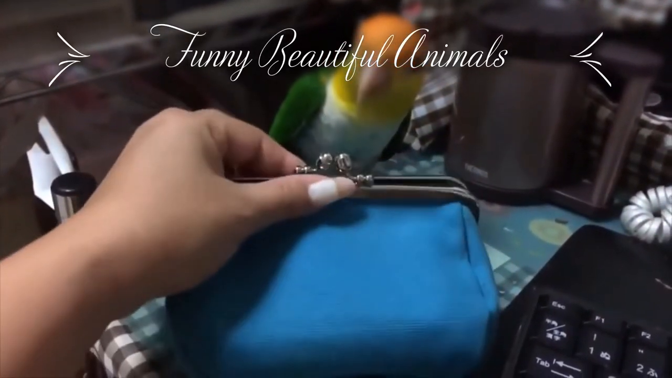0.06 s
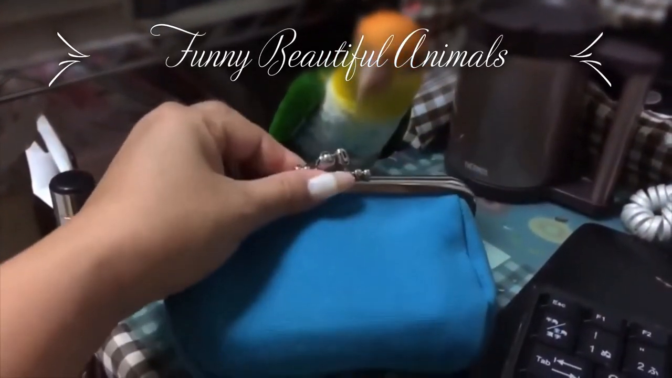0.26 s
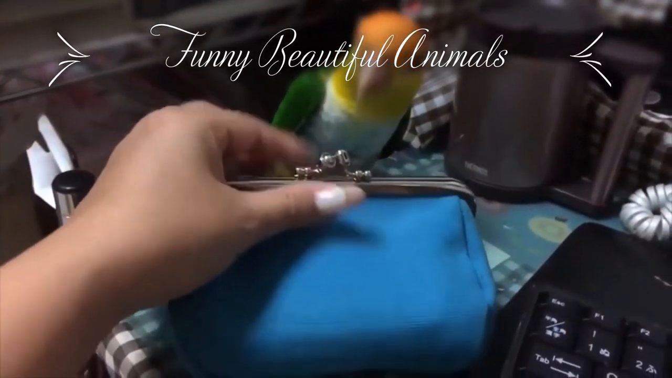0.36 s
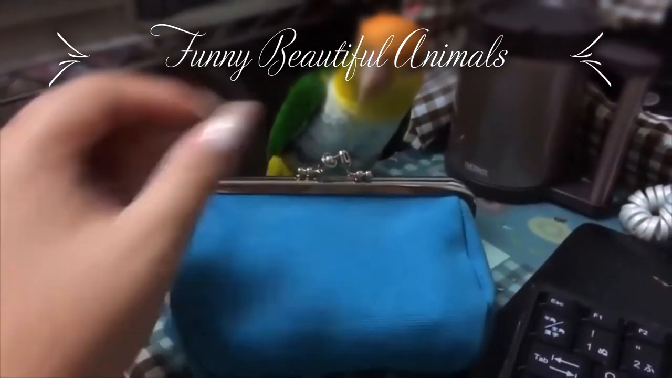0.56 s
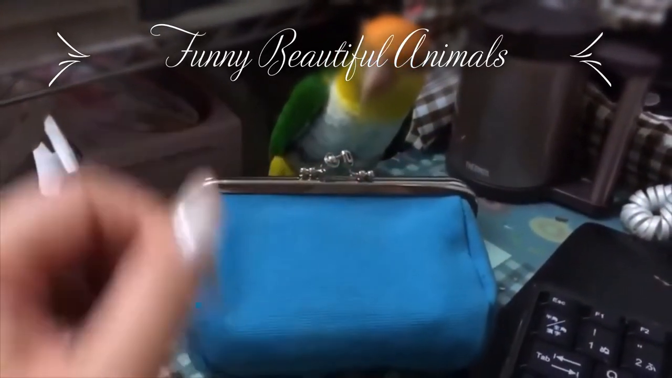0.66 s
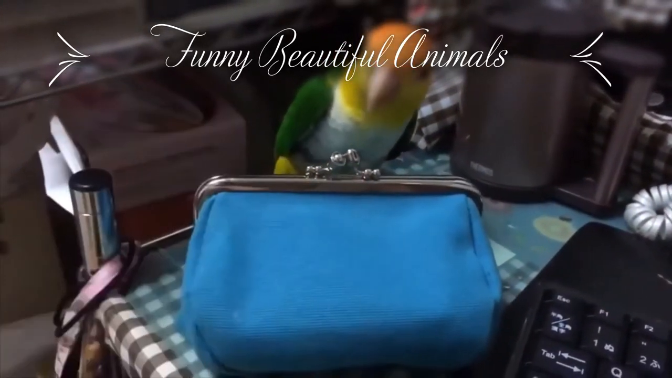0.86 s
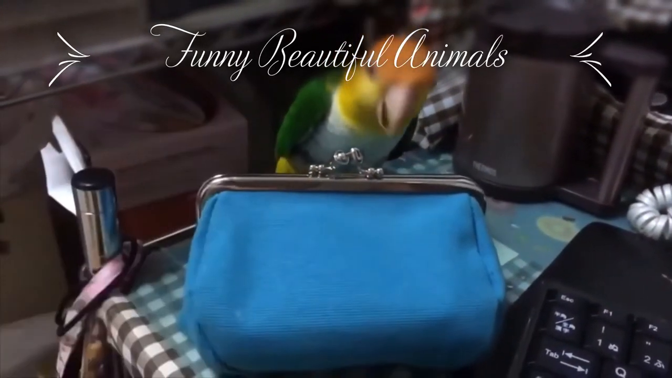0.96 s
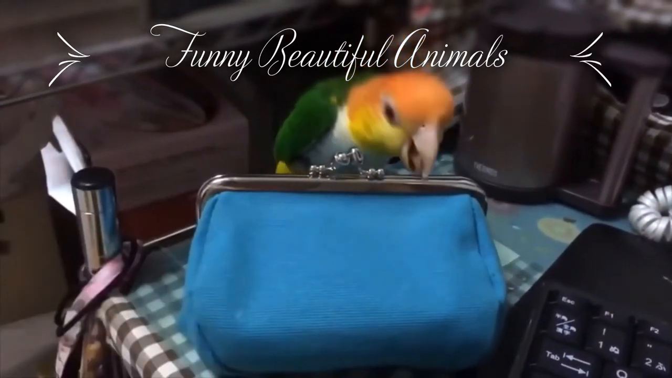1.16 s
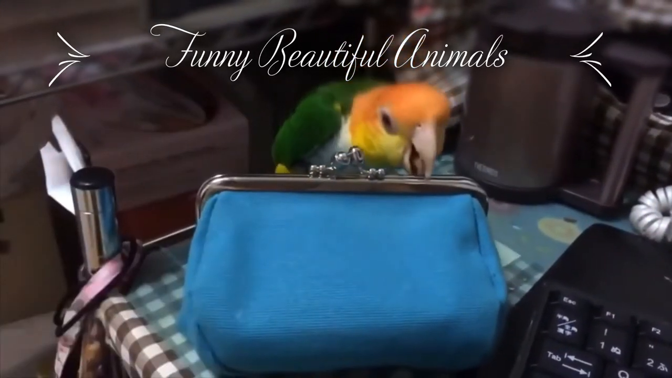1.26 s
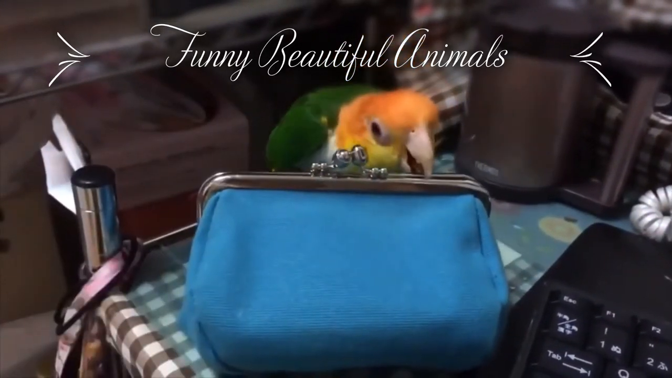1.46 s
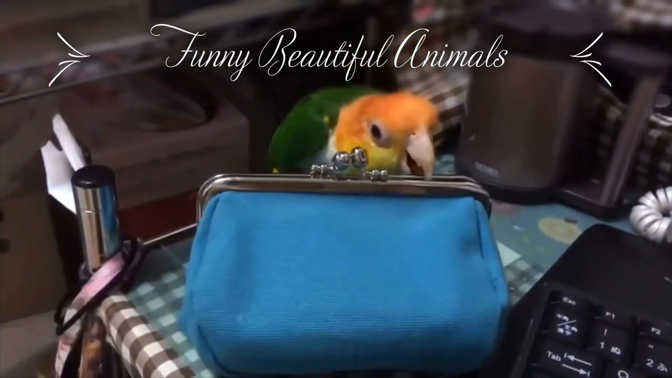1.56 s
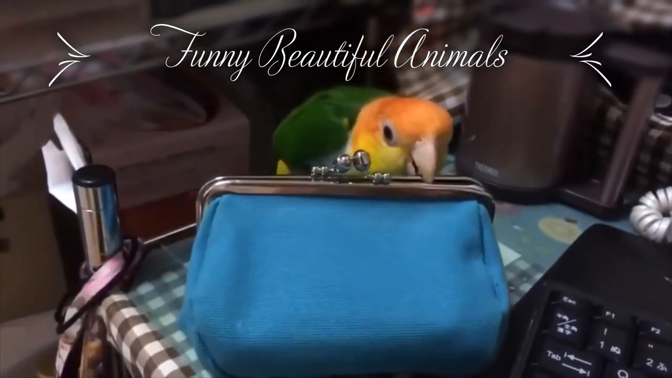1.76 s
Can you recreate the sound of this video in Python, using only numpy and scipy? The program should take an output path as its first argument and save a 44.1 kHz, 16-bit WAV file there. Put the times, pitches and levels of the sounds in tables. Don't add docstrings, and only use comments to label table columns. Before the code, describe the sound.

Metal purse clasp snapping shut with a sharp ringing crack, then faint beak and claw ticks over hum

```python
import sys
import numpy as np
from scipy import signal
from scipy.fft import rfft, irfft
from scipy.io import wavfile

SR = 44100
rng = np.random.default_rng(int(sys.argv[2]) if len(sys.argv) > 2 else 0)


def nominal_scale(level):
    x = np.asarray(level, float) / 20
    return 10 ** x


def generate_wav(sig):
    pcm = np.round(np.clip(np.atleast_2d(sig).T, -1, 1) * 32767).astype(np.int16)
    wavfile.write(sys.argv[1], SR, pcm)


N = 79380

# start in seconds, peak level in dB.
SNAP = [
    (.2291, -30.5),
    (.2300, -42),
    (.2297, -7),
    (.2308, -14),
    (.2319, -28),
    (.2342, -29),
    (.2395, -29),
    (.2415, -27.5),
    (.2440, -31),
]
SNAP_S = SNAP[1][0]


def read(points, hz):
    f, value = np.transpose(points)
    return np.interp(np.log(hz + 1), np.log(f + 1), value)


def evened(x):
    return x / np.sqrt(np.mean(x ** 2) + 1e-20)


def add(mix, s, sound):
    part = mix[round(s * SR):][:len(sound)]
    part += sound[:len(part)]


def shaped(gain):
    spectrum = rfft(rng.standard_normal(N))
    return irfft(spectrum * gain(np.fft.rfftfreq(N, 1 / SR)), N)


def knocks(events, ring, grit_db, grit_s, rise_s):
    out, t = np.zeros(N), np.arange(1500) / SR
    hz, width, db = np.transpose(ring)[:, :, None]
    rise = 1 - np.exp(-t / rise_s)
    fading = nominal_scale(db) * width * np.exp(-np.pi * width * t)
    band = signal.butter(2, [2500, 9000], "band", fs=SR)
    for s, peak_db, *pitch in events:
        modes = rise * (fading * np.sin(2 * np.pi * hz * np.prod(pitch) * t)).sum(axis=0)
        scrape = signal.lfilter(*band, rng.standard_normal(len(t)))
        grit = nominal_scale(grit_db) * scrape * np.exp(-t / grit_s)
        add(out, s, -nominal_scale(peak_db) * (modes / abs(modes).max() + rise * grit))
    return out


def frame_ring(s, modes, db, rise_s):
    out, t = np.zeros(N), np.arange(12000) / SR
    ring = np.zeros(len(t))
    for hz, mode_db, t60 in modes:
        tone = np.sin(2 * np.pi * (hz * t + rng.random()))
        beat = 1 + 0.41 * np.sin(2 * np.pi * (rng.uniform(25, 50) * t + rng.random()))
        ring += nominal_scale(db + mode_db - 60 * t / t60) * tone * beat
    add(out, s, ring * np.minimum(t / rise_s, 1))
    return out


def swells(rows):
    out = np.zeros(N)
    for s, db, hz, length in rows:
        t = np.arange(0, 4 * length, 1 / SR)
        envelope = np.e * t / length * 2 * np.exp(-2 * t / length)
        add(out, s, nominal_scale(db) * envelope * np.sin(2 * np.pi * hz * t))
    return out


def hum():
    # time in seconds, level in dB.
    swell = [(0.0, -49), (0.04, -48), (0.084, -50), (0.224, -52), (0.26, -49.5), (0.29, -64), (0.38, -62.5),
             (0.956, -49.5), (1.006, -58.5), (1.066, -52), (1.148, -62.5), (1.212, -57.5), (1.252, -59.5),
             (1.448, -57.5), (1.538, -49.5), (1.624, -48.5), (1.684, -59), (1.8, -53.5)]
    hum_hz, buzz_hz, buzz_db, wobble_rad = 58.4, 119.5, -7, .5
    t = np.arange(N) / SR
    drift = wobble_rad * evened(shaped(lambda f: f < 8))
    flutter = nominal_scale(2.5 * evened(shaped(lambda f: f < 12)))
    low = np.sin(2 * np.pi * hum_hz * t + drift)
    buzz = nominal_scale(buzz_db) * flutter * np.sin(2 * np.pi * buzz_hz * t + 1.5 * drift)
    return np.sqrt(2) * nominal_scale(np.interp(t, *np.transpose(swell))) * (low + buzz)


def air():
    # frequency in Hz, level in dB per Hz.
    colour = [(145, -8.5), (243, -4), (447, -8.5), (760, -11), (1080, -8), (1500, -10.5), (2550, -16.5),
              (3200, -26.5)]
    # centre in Hz, width in Hz, level in dB.
    fan = [(1060, 110, -70.5), (954, 25, -75.5), (1075, 20, -79), (1108, 20, -76), (1118, 32, -72.5),
           (1658, 25, -75), (1425, 30, -81), (481, 25, -77), (2057, 40, -81.5), (301, 8.7, -72.5),
           (364, 22.8, -75.5), (244, 9.4, -72.5), (78, 110, -61.5)]
    out = nominal_scale(-62) * evened(shaped(lambda f: nominal_scale(read(colour, f)) * (f > 130) * (f < 3200)))
    for hz, width, db in fan:
        out += nominal_scale(db) * evened(shaped(lambda f: 1 / (1 + (2 * (f - hz) / width) ** 2)))
    return out


def rustle():
    # frequency in Hz, level in dB per Hz.
    colour = [(1650, -31), (2800, 0), (5410, -7), (5890, -7.5), (6360, -6.5), (7130, -6.5), (15200, -16.5)]
    # time in seconds, level in dB.
    stir = [(0, -68.5), (.09, -76), (0.198, -72.5), (.45, -76.5), (.62, -75), (.75, -71.5), (.93, -73.5),
            (1.101, -75), (1.3, -74), (1.8, -74.5)]
    level = nominal_scale(np.interp(np.arange(N) / SR, *np.transpose(stir)))
    return level * evened(shaped(lambda f: nominal_scale(read(colour, f)) * (f > 3200)))


def first_slip():
    # start in seconds, peak level in dB.
    ticks = [
        (.01745, -19.5),
        (.0220, -40),
        (.0275, -43),
    ]
    # frequency in Hz, width in Hz, level in dB.
    modes = [(2610, 400, -15), (3400, 500, -9), (4060, 330, -2), (5120, 330, -1), (5450, 400, -5),
             (6750, 400, -10), (8270, 360, -8), (9200, 240, -10), (10500, 290, -17)]
    # frequency in Hz, level in dB, time to fade by 60 dB in seconds.
    lingering = [(3970, -18, 0.11), (5370, -18, 0.085), (3670, -5.5, 0.12), (4800, -16, 0.079),
                 (9650, 6, 0.054), (5600, -12, 0.084)]
    tick = knocks(ticks, modes, grit_db=-20, grit_s=.002, rise_s=.00015)
    return tick, frame_ring(ticks[0][0], lingering, db=-52, rise_s=0.00056)


def thumps():
    # start in seconds, peak level in dB, frequency in Hz, length in seconds.
    rows = [(.0190, -50, 176, .0087), (.0182, -36, 1330, .0022), (.022, -45, 1300, .002),
            (.0222, -42, 4250, .002), (.2065, -50, 1650, .006), (.215, -50, 2100, .006),
            (.2195, -32, 130, .0027), (.228, -35, 256, .003), (.2297, -29, 400, .0011),
            (.2300, -32, 130, .0028), (1.2352, -44.5, 465, .003), (1.2365, -49, 960, .002),
            (1.2375, -54, 1900, .002), (1.241, -52, 480, .003), (1.2695, -47, 880, .002),
            (1.27, -50, 460, .0032), (1.2715, -59, 1490, .0017), (1.4298, -58, 5300, .0015)]
    return swells(rows)


def second_slip():
    # start in seconds, peak level in dB, pitch factor.
    ticks = [
        (.2041, -25.5, 1.02),
        (.2075, -43.5, 0.77),
        (.2185, -49.5, 0.79),
    ]
    # frequency in Hz, width in Hz, level in dB.
    modes = [(1658, 250, -8.5), (3437, 550, -0.5), (4600, 600, -1), (5600, 560, -9), (7890, 500, -5),
             (9450, 500, -10.5), (11300, 400, -18), (12700, 450, -20.5)]
    return knocks(ticks, modes, grit_db=-17, grit_s=0.002, rise_s=.0003)


def blow():
    u = (np.arange(N) / SR - SNAP_S) / .00009
    lead_in = .6 * np.exp(-(u + 1.7) ** 2 * 2)
    dip = np.exp(-u ** 2 / 2)
    swing_back = .2 * np.exp(-(u - 4.5) ** 2 / 6)
    return nominal_scale(-1.5) * (lead_in - dip + swing_back)


def snap():
    # frequency in Hz, width in Hz, level in dB.
    modes = [(1160, 430, -18), (2400, 400, -8), (3350, 400, -4), (3600, 380, -2), (4250, 450, -5),
             (5000, 600, -7), (5830, 400, -8), (7220, 380, -4), (8000, 600, -5), (9710, 500, -3),
             (10500, 450, -8), (11800, 420, -7), (12800, 450, -10), (14500, 500, -13)]
    return knocks(SNAP, modes, grit_db=1.5, grit_s=0.0014, rise_s=.0006) + blow()


def snap_ring():
    # frequency in Hz, level in dB, time to fade by 60 dB in seconds.
    modes = [(994, -2.5, .2), (4183, -8, .09), (10900, -6.5, .12), (1362, -8, .13), (2047, -3.5, 0.21),
             (2172, -3.5, 0.17), (2240, -4.5, .2), (2476, -0.5, 0.23), (3400, -5, 0.28), (3680, -3, .17),
             (3720, -7, 0.18), (4840, -5.5, 0.27), (8040, -4.5, .13)]
    return frame_ring(SNAP_S, modes, db=-38.0, rise_s=0.026)


def room(x, tone, db):
    # frequency in Hz, time to fade by 60 dB in seconds.
    fade = [(100, .08), (400, 0.15), (1000, 0.15), (2300, 0.24), (4500, 0.21), (8000, .19), (14000, 0.13)]
    hz, t, z = signal.stft(rng.standard_normal(SR // 2), SR, nperseg=128)
    level_db = read(tone, hz)[:, None] - 60 * t / read(fade, hz)[:, None]
    tail = signal.istft(z * nominal_scale(level_db), SR, nperseg=128)[1]
    tail = tail * np.clip(np.arange(len(tail)) / SR / 0.012, 0, 1)
    return nominal_scale(db) * signal.fftconvolve(x, tail / np.linalg.norm(tail))[:N]


def echoes(near, small):
    # frequency in Hz, level in dB per Hz.
    snap_tone = [(88, -46), (150, -11), (854, -14.5), (1330, -6.5), (1580, -9.5), (2160, -10.5),
                 (6620, -15), (11200, -10), (15200, -17)]
    # frequency in Hz, level in dB.
    small_tone = [(300, -6.5), (1300, -8), (2250, -1), (3500, -3), (6500, -13), (9000, -1.5),
                  (15000, -10.5)]
    # start in seconds, peak level in dB, frequency in Hz, length in seconds.
    flares = [(.2375, -33, 1100, .005), (.2425, -35, 1350, .004), (.243, -31, 3410, .009),
              (.2435, -32, 2450, .006), (.2545, -31, 2140, .005), (.2585, -37, 3570, .004),
              (.260, -36, 2480, .005), (.2665, -33, 2200, .005), (.275, -41, 1950, .005),
              (.281, -40, 2150, .005), (.287, -40, 2350, .008)]
    bang = np.linalg.norm(near) * (np.arange(N) == round(SNAP_S * SR))
    return room(bang, snap_tone, -8) + room(small, small_tone, -19.5) + swells(flares)


def duck():
    drop_db, start_s, recover_s = -7, .25, .25
    since = np.arange(N) / SR - start_s
    return nominal_scale(drop_db * (since > 0) * np.exp(-np.maximum(since, 0) / recover_s))


def claw_tap():
    # start in seconds, peak level in dB, pitch factor.
    ticks = [
        (1.2348, -46, 1.0),
        (1.2362, -56, 1.0),
    ]
    # frequency in Hz, width in Hz, level in dB.
    modes = [(1970, 390, 0), (3040, 310, 0), (3540, 430, 3), (4360, 330, 2), (5250, 940, 0.5),
             (6040, 330, -4), (7910, 500, -19), (9630, 600, -11)]
    return knocks(ticks, modes, grit_db=-4, grit_s=0.0016, rise_s=0.00028)


def beak_tick():
    # start in seconds, peak level in dB, pitch factor.
    ticks = [
        (1.2685, -40, 1.0),
        (1.2697, -52, 1.0),
    ]
    # frequency in Hz, width in Hz, level in dB.
    modes = [(2400, 160, 1), (2950, 300, -1), (3300, 300, -4), (4170, 300, -1), (5080, 450, -4),
             (6130, 400, -10), (6980, 450, -8), (9550, 900, -17)]
    return knocks(ticks, modes, grit_db=-18, grit_s=0.002, rise_s=.0004)


def light_taps():
    # start in seconds, peak level in dB, pitch factor.
    ticks = [
        (1.3503, -46.5, 1.0),
        (1.7200, -51.5, 0.77),
    ]
    # frequency in Hz, width in Hz, level in dB.
    modes = [(2420, 155, 2.5), (3000, 400, -2.5), (4140, 400, -7), (5040, 300, -10.5), (6770, 400, -9),
             (8450, 350, -13), (10460, 500, -11), (12040, 660, -18)]
    return knocks(ticks, modes, grit_db=-7, grit_s=.0015, rise_s=0.00025)


def scene():
    slip, slip_ring = first_slip()
    near = snap()
    small = slip + thumps() + second_slip() + claw_tap() + beak_tick() + light_taps()
    background = hum() + duck() * air() + rustle()
    return (near + small + slip_ring + snap_ring() + echoes(near, small) + background)[None]


def roll_off(x):
    return signal.sosfilt(signal.butter(12, 16660, fs=SR, output="sos"), x)


def record(dry):
    # time in seconds, lowest weakened frequency in Hz, depth in dB.
    treble_dips = [(.0675, 5800, -15), (0.302, 250, -8), (0.299, 4900, -15), (.4395, 2700, -4),
                   (0.648, 3500, -11), (1.020, 3000, -12.5), (1.153, 2500, -18), (1.324, 2700, -18.5)]
    # time in seconds, frequency in Hz, level in dB.
    lone_tones = [(0.072, 9600, -77), (.0675, 5300, -80), (.302, 10900, -53.5), (.302, 4600, -51),
                  (.302, 3720, -52), (.302, 3300, -54), (.299, 2370, -51), (.302, 1950, -53),
                  (0.071, 3900, -69), (.066, 4900, -78), (1.02, 5400, -71), (0.308, 1000, -54),
                  (0.4391, 8700, -74.5), (0.4401, 8500, -89), (0.4391, 6400, -86), (.649, 8000, -86.5),
                  (.649, 8800, -76.5), (0.73, 3900, -76), (1.020, 8000, -78), (1.325, 6400, -79)]
    dip_s, tone_s = .014, .009
    hz, t, z = signal.stft(dry, SR, nperseg=256)
    away_from_snap = abs(t - SNAP_S) > .012
    lost_db = -50 * (hz[:, None] > 15250) * away_from_snap - 60 * (hz[:, None] > 16300)
    for s, low_hz, db in treble_dips:
        lost_db = lost_db + db * (hz > low_hz)[:, None] * np.exp(-((t - s) / dip_s * 2) ** 2)
    mix = signal.istft(z * nominal_scale(lost_db), SR, nperseg=256)[1][:, :N]
    t = np.arange(N) / SR
    for s, tone_hz, db in lone_tones:
        mix = mix + nominal_scale(db) * np.exp(-((t - s) / tone_s) ** 2) * np.sin(2 * np.pi * tone_hz * t)
    rumble_cut = signal.butter(2, 36, "high", fs=SR, output="sos")
    return roll_off(signal.sosfilt(rumble_cut, mix))


dry = scene()
out = record(dry)
generate_wav(out)
```